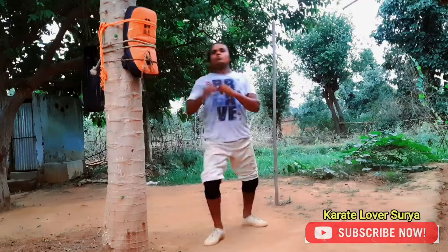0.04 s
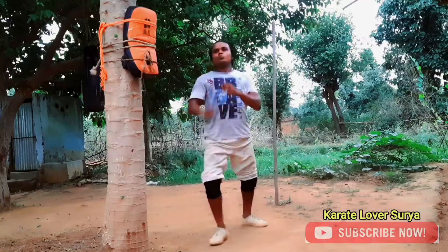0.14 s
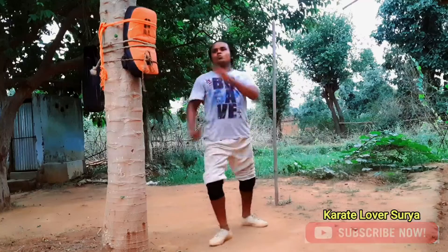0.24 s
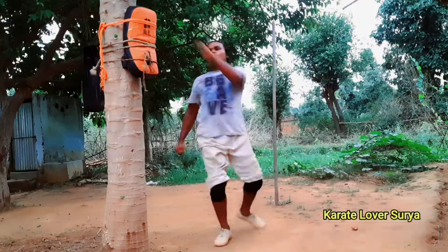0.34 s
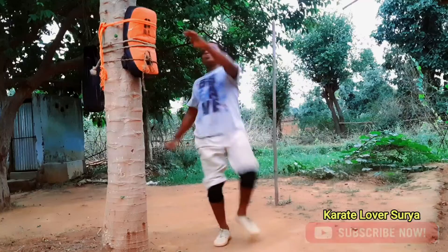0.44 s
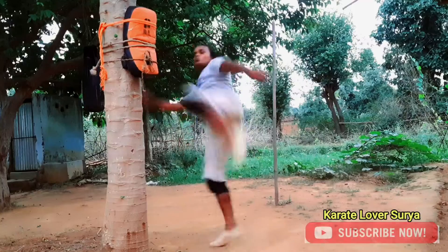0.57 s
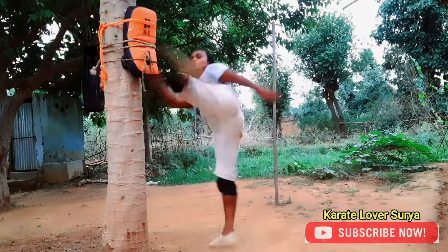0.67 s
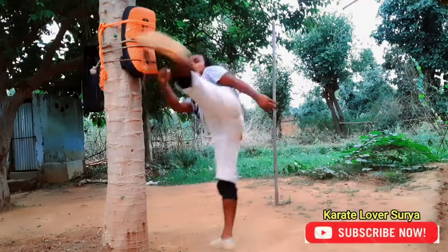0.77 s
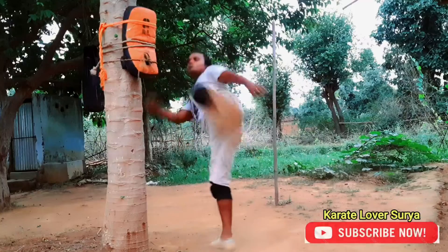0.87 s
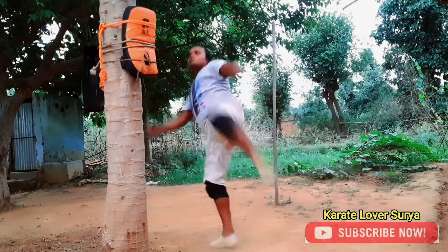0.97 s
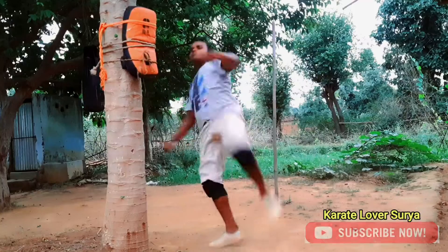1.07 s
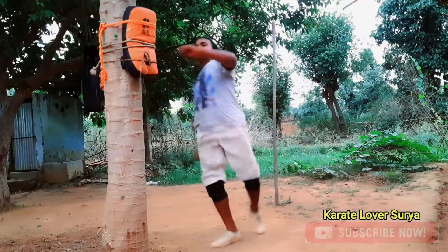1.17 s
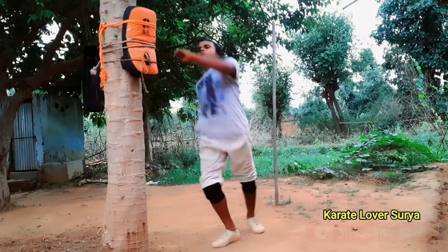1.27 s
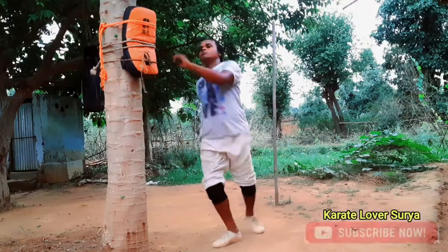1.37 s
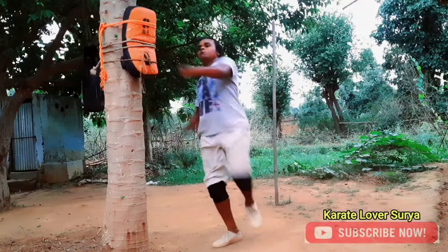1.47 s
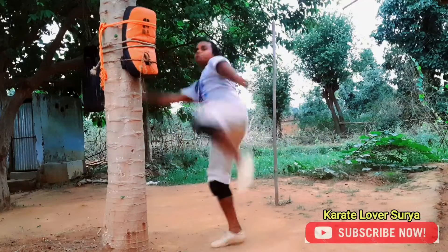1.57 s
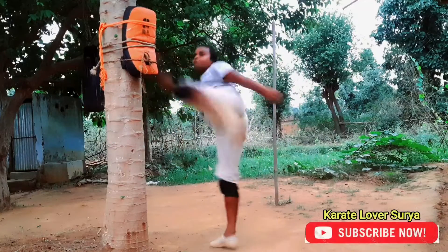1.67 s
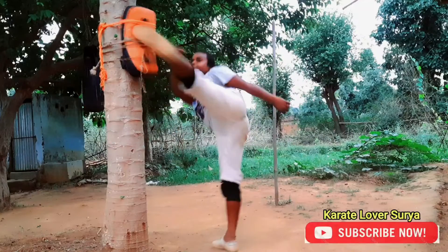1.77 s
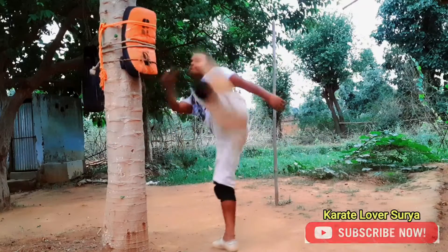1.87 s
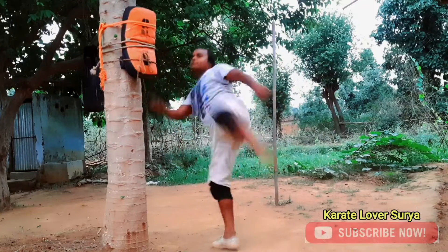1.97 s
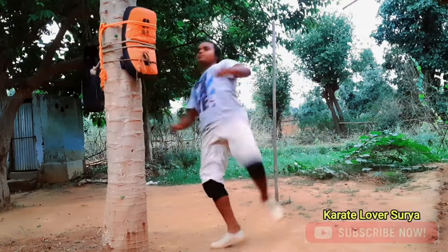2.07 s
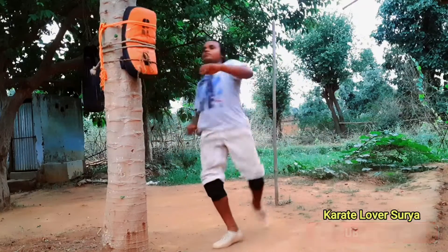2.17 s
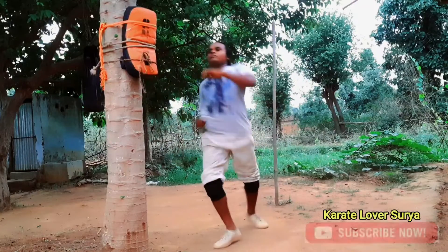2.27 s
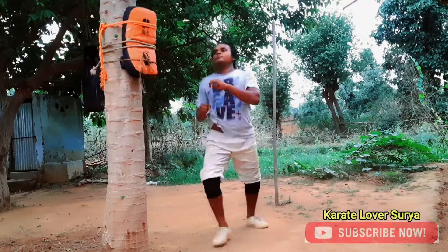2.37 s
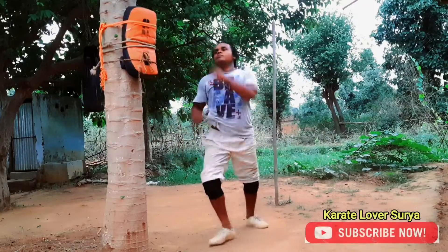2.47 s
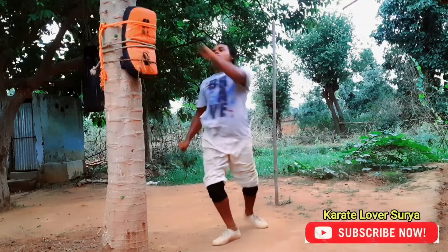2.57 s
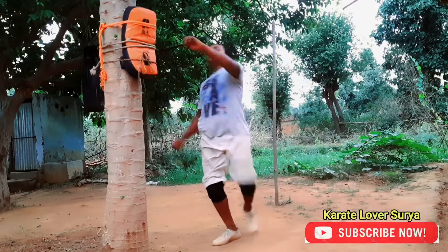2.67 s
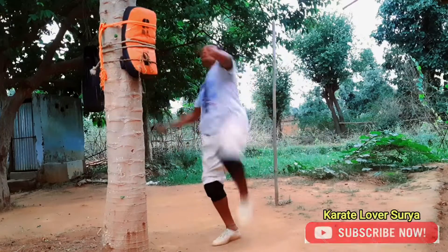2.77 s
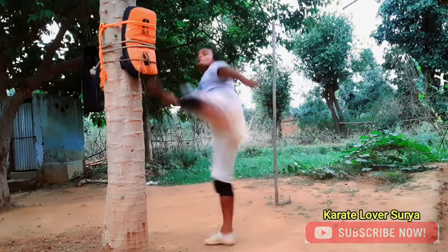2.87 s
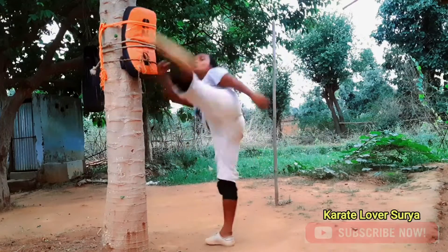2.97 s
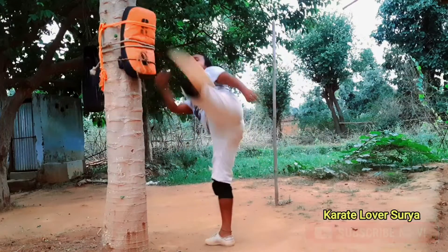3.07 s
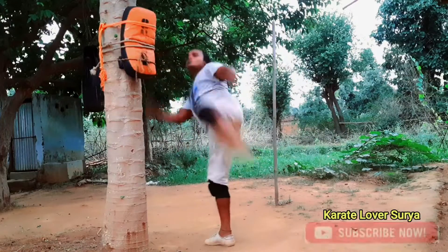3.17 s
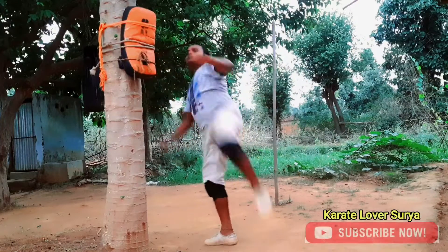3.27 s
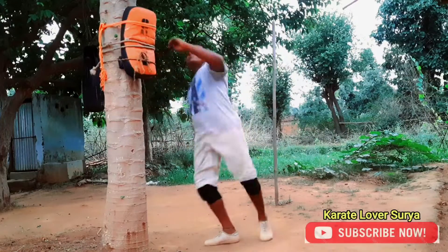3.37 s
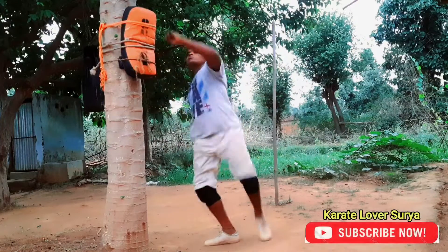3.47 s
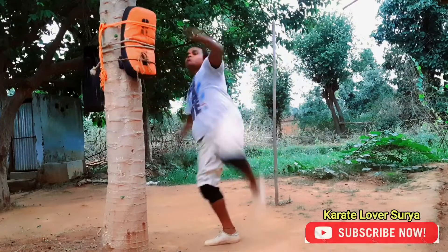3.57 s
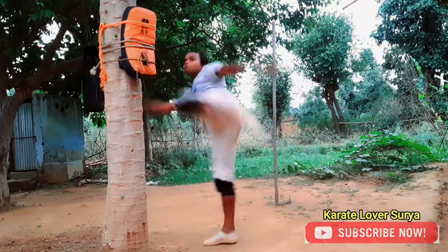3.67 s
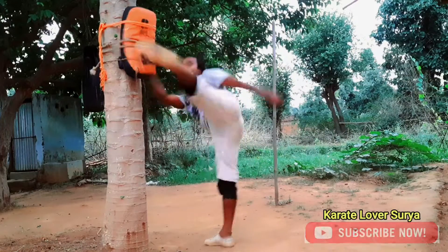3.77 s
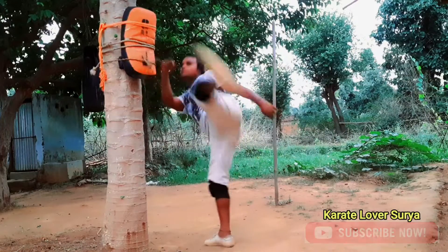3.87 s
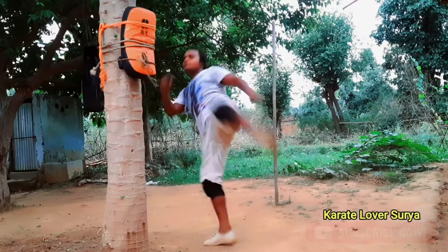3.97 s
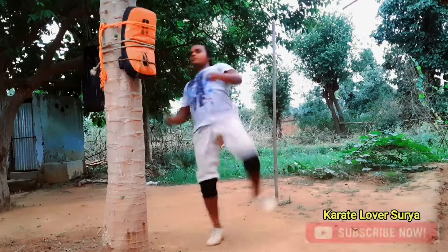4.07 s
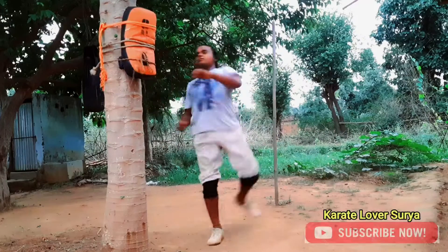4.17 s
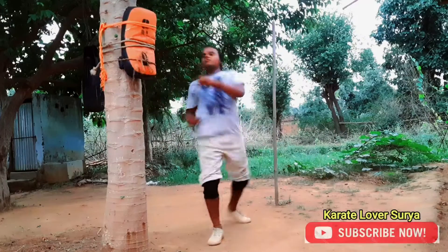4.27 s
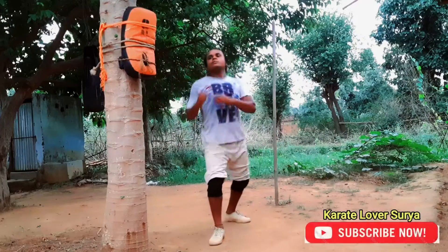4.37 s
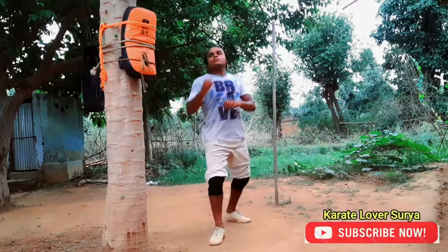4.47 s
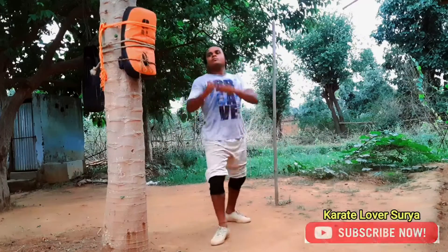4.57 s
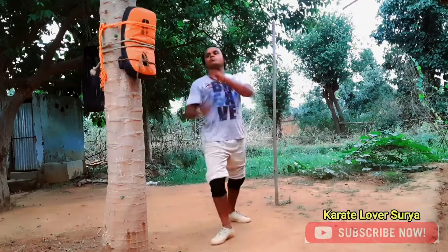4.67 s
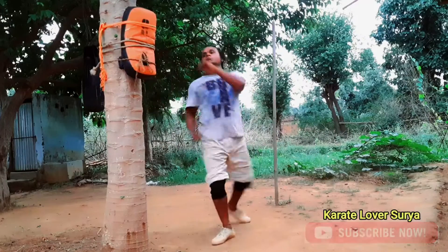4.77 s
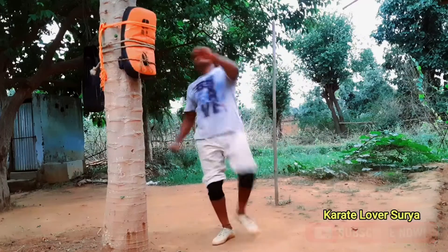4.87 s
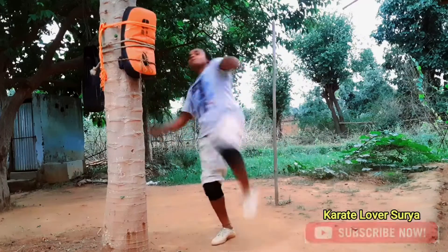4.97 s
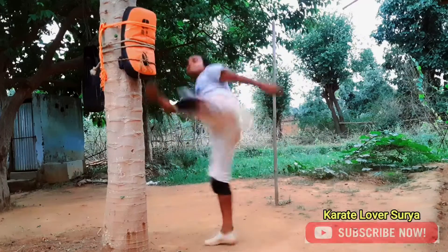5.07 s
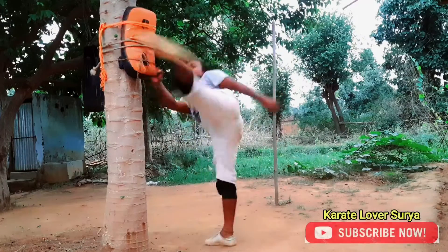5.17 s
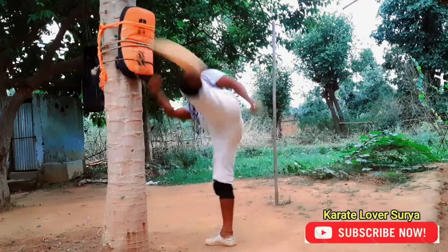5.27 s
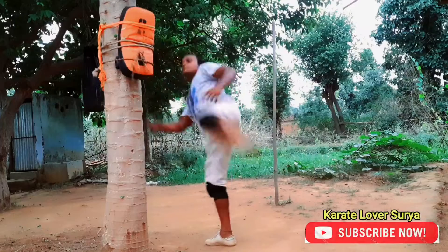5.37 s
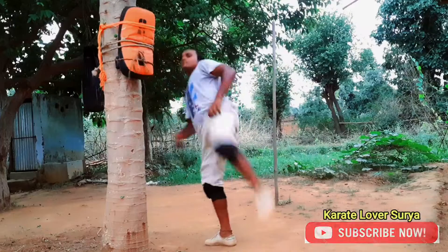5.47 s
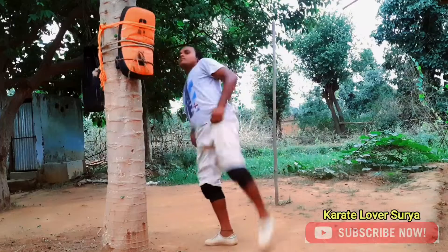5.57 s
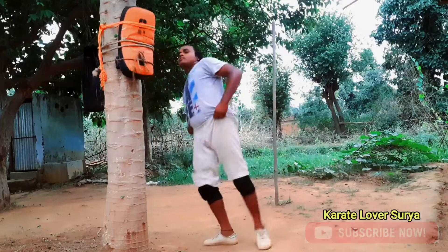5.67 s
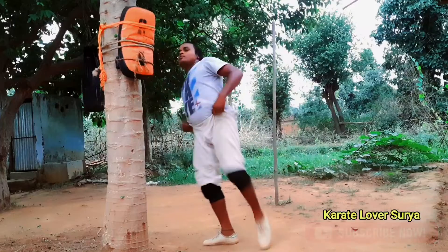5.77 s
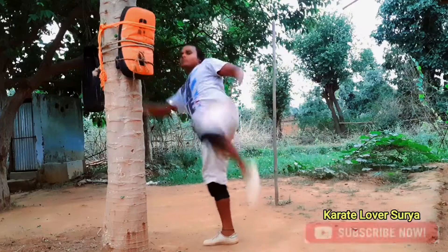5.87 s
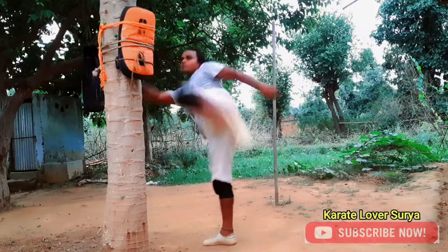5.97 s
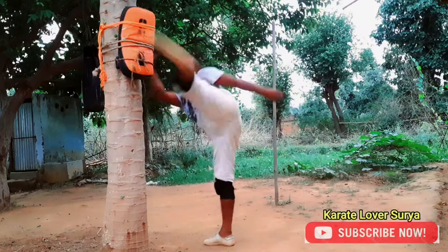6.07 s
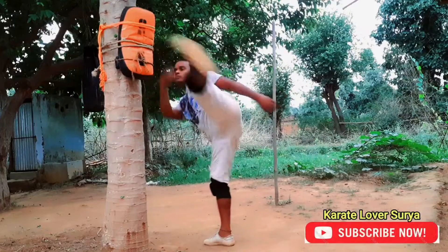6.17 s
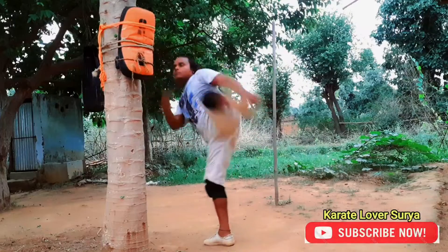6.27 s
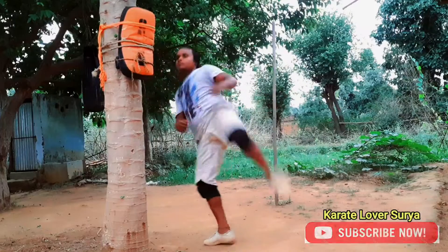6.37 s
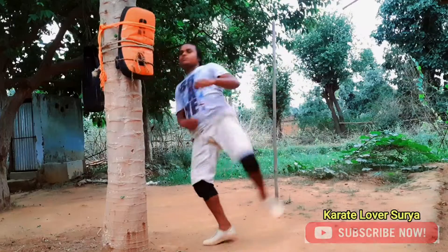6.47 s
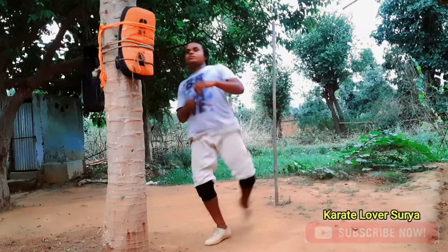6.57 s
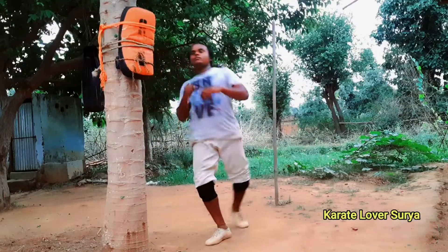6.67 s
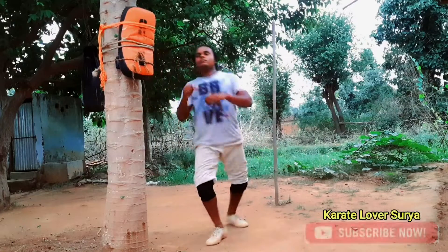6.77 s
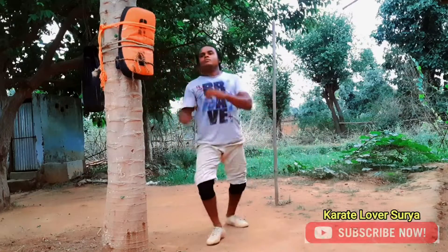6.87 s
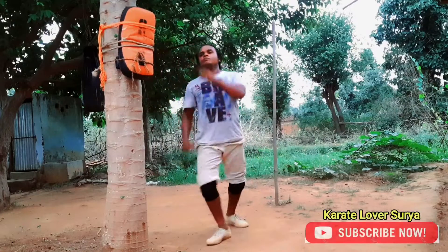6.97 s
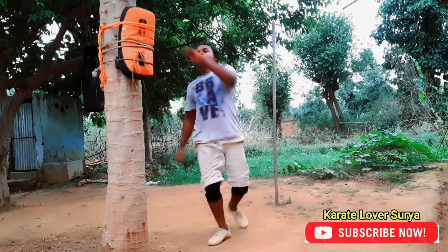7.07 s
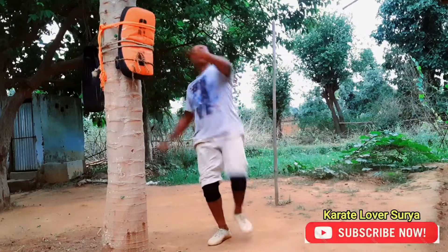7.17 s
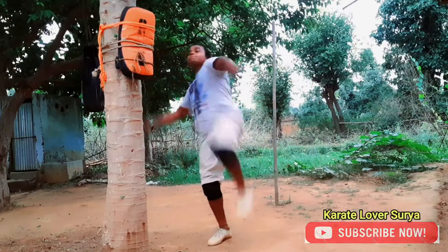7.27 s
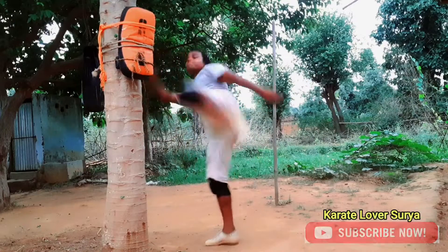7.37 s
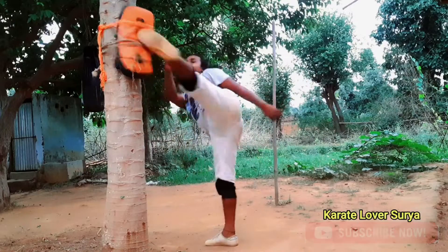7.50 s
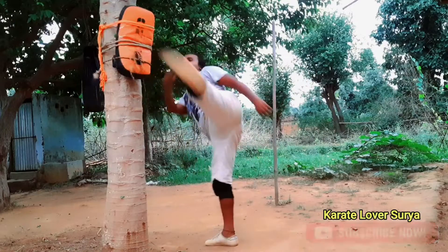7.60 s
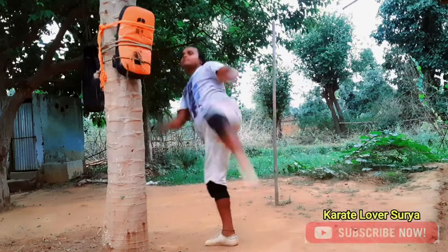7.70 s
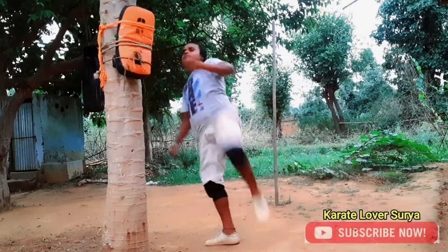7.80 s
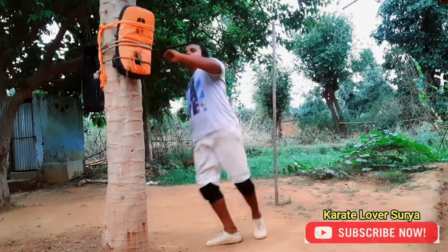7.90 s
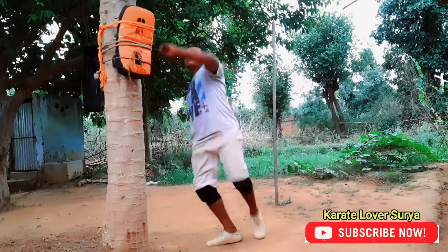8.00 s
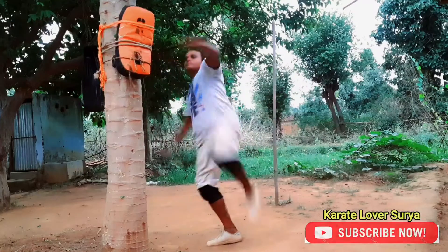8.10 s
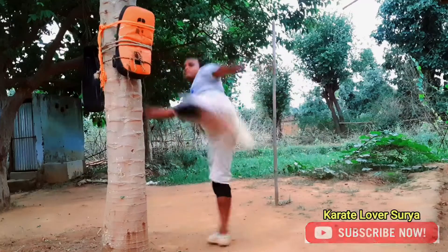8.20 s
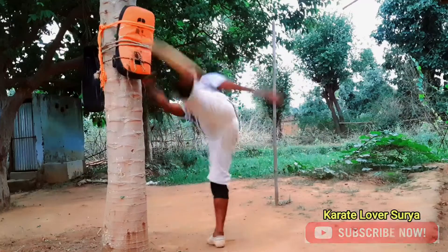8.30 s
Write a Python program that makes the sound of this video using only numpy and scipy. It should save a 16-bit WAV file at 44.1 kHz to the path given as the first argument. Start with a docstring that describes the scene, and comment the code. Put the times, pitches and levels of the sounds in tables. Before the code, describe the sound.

Seven hard kicks slap a foam pad tied to a tree, shoes scuffing sand between them, over faint cicadas and distant birds.

```python
"""Cicadas (swaying noise band), a cricket (gated narrow noise) and far leaves with hiss and rumble (noise) sound throughout.
Shoes slide on sand (granular noise) from the start, and far roosters crow early (two gliding partials), later sparsely.
From 0.8 s seven roundhouse kicks hit a foam pad tied to a tree trunk in a yard: noise slap, damped modes, scattered tail.
Between kicks shoes land (taps, crunch and thud). A small bird tweets from 1.4 s and a cuckoo hoots from 2.1 s (swept sines).
Two microphone ports hear it all."""
import sys
import numpy as np
from scipy import signal
from scipy.fft import rfft, irfft, next_fast_len
from scipy.io import wavfile
from scipy.ndimage import uniform_filter1d, map_coordinates

SR = 44100
rng = np.random.default_rng(int(sys.argv[2]) if len(sys.argv) > 2 else 0)


def master_out(mix):
    """Clip the mix to full scale and print it as 16-bit PCM to the path in sys.argv[1]."""
    frames = np.transpose(np.atleast_2d(mix))
    ceiling = np.clip(frames, -1, 1)
    pcm = np.round(ceiling * 32767).astype(np.int16)
    wavfile.write(sys.argv[1], SR, pcm)


N = 367794

# The kicks: start_s, level_db (before the slight left-right balance), then, relative to it, thump_db,
# knock_db for pad modes in four bands (below 400, 500, 850 Hz and above), treble_db (snap against slap),
# scatter_db; last contact_s
KICK_EVENTS = [(.769, -2.5, -6.5, -15, -19.5, -21, -19, -21, -16, 0.0054),
               (1.811, -5.5, -4.5, -27, -20, -10.5, -22, -14.5, -13, 0.0083),
               (3.042, -7, -7, -19, -13.5, -17, -17, -14, -14.5, .008),
               (3.818, -5, -9.5, -20, -3, -16, -13.5, -16, -15, 0.0098),
               (5.24, -7, -7, -11.5, -18.5, -18.5, -17.5, -14.5, -14.5, .008),
               (6.129, -1.5, -11, -20.5, -19.5, -26, -15, -10.5, -15.5, .007),
               (7.552, -8.5, -8, -25.5, -27, -21, -19, -16, -16, .006)]
# Relative spectra: frequency_hz, density_db (dB per Hz)
SAND_SCRAPE_SPECTRUM = [(120, -43.5), (200, -14.5), (329, -4.5), (433, -9), (624, -3), (1680, -8.5),
                        (2800, -15), (3640, -41.5), (6160, -120)]
SAND_GRIT_SPECTRUM = [(1470, -22), (2500, -6), (2940, -6), (5230, -6.5), (6600, -11.5), (7950, -10.5),
                      (14700, -22), (15600, -30), (16000, -47)]
LOW_RUMBLE_SPECTRUM = [(30, -25.5), (60, 2.5), (120, 2), (250, -4.5), (400, -28)]


def amp(db):
    """Logarithmic level: decibels to amplitude gain."""
    return 10 ** (np.asarray(db) / 20)


def unit(x):
    """Power normalization: scale to rms 1."""
    return x / np.sqrt(np.mean(x ** 2) + 1e-20)


def along(points, hz):
    """Logarithmic frequency scale: read (Hz, value) points at hz."""
    f, value = np.transpose(points)
    return np.interp(np.log(hz + 1), np.log(f + 1), value)


def curves(rows):
    """Linear interpolation in time: one value per sample for each column after the time."""
    s, *columns = np.transpose(rows)
    return [np.interp(np.arange(N) / SR, s, column) for column in columns]


def wobble(rate):
    """Slow random modulation: a smooth curve through rate random knots a second."""
    knots = rng.standard_normal(int(N * rate / SR) + 4)
    return map_coordinates(knots, [np.arange(N) * rate / SR])


def noise(gain, alike, n=N, mono_hz=0):
    """Partial coherence: rms-1 noise shaped by gain; left-right correlation alike, nearing 1 below mono_hz."""
    m = next_fast_len(n)
    hz = np.fft.rfftfreq(m, 1 / SR) + 1
    angle = np.arccos(np.clip(alike, -1, 1)) / 2 * hz / (hz + mono_hz)
    spectrum = rfft(rng.standard_normal((2, m))) * gain(hz)
    mid, side = irfft(spectrum * [np.cos(angle), np.sin(angle)], m)[:, :n]
    return unit(np.array([mid + side, mid - side]))


def colour(points):
    """Spectral shaping: the gain function of a spectrum table."""
    return lambda hz: amp(along(points, hz))


def band(hz, width_hz):
    """Resonance: gain over frequency that is halved half a width from the centre."""
    return lambda f: 1 / (1 + ((f - hz) / width_hz * 2) ** 2)


def add(out, s, x):
    """Linear superposition: mix x into out from time s."""
    part = out[:, round(s * SR):][:, :x.shape[-1]]
    part += x[..., :part.shape[1]]


def far(x, rate):
    """Multipath fading: a distant tone arrives by many paths, so its level flutters apart at each port."""
    return x * amp(2.7 * np.array([wobble(rate), wobble(rate)]))


def strokes(rows, spread):
    """Power summation: gain of overlapping strokes (s, hold s, dB, rise s, fall s); spread scales rise and fall."""
    t = np.arange(N) / SR
    power = 0
    for s, hold, db, rise, fall in rows:
        distance = np.maximum(np.maximum((s - t) / rise, (t - s - hold) / fall), 0)
        power = power + amp(db - 20 * distance / spread) ** 2
    return np.sqrt(power)


def air():
    """Broadband random noise: far leaves and microphone hiss, over a low rumble that comes and goes."""
    # Leaves and hiss, relative spectrum: frequency_hz, density_db (dB per Hz)
    leaf_spectrum = [(15, -26), (25, 0), (476, -10.5), (659, -13), (818, -12), (1070, -20), (3430, -18.5),
                     (4490, -11.5), (5430, -5.5), (7920, -8), (9320, -23.5), (14800, -18), (16000, -40)]
    rumble_db = -70.0 + 1.4 * wobble(0.67) + 2.5 * wobble(4.1)
    rumble = amp(rumble_db) * noise(colour(LOW_RUMBLE_SPECTRUM), 0.12)
    return rumble + amp(-61 + 0.78 * wobble(3)) * noise(colour(leaf_spectrum), .05)


def cicadas():
    """Quadrature modulation: slow noise on a swaying carrier is a buzzing band; a fainter fixed band joins it."""
    # Chorus level: time_s, level_db
    chorus_level = [(0.0, -56), (0.25, -54), (0.63, -57), (1.16, -59), (2.06, -59), (2.42, -59), (3.0, -55),
                    (3.21, -61), (4.44, -61.5), (4.78, -60.5), (5.22, -59), (5.67, -59), (5.78, -60.5),
                    (6.57, -58), (6.71, -60), (6.9, -64), (7.55, -57), (8.34, -59)]
    centre_hz, width_hz = 5330, 640
    sway_hz, sway_period_s, sway_top_s = 149.7, .575, 4.6  # the centre is highest at the top time
    side_hz, side_width_hz, side_db = 6230, 200, -11  # level relative to the main chorus
    level_db, = curves(chorus_level)
    hz = centre_hz + sway_hz * np.cos(2 * np.pi * (np.arange(N) / SR - sway_top_s) / sway_period_s)
    phase = 2 * np.pi * np.cumsum(hz) / SR

    def slow(f):
        """Low-pass filtering: it sets the width of the modulated band."""
        return 1 / (1 + (2 * f / width_hz) ** 4)

    chorus = noise(slow, -.2) * np.cos(phase) + noise(slow, -0.18) * np.sin(phase)
    buzz = unit(amp(1.1 * wobble(200) + 0.66 * wobble(19)))
    side_chorus = amp(side_db) * noise(band(side_hz, side_width_hz), 0)
    return amp(level_db) * (buzz * chorus + side_chorus)


def cricket():
    """Amplitude gating: about ten chirps a second of narrow noise, each filling three fifths of its period."""
    # Chirp timing: time_s, chirps_so_far (count)
    chirp_count = [(.1, 0), (1.385, 13), (2.465, 24), (2.97, 29), (4.425, 43), (5.04, 49), (6.99, 68),
                   (7.79, 76), (8.4, 82)]
    phase = curves(chirp_count)[0] % 1
    gate = np.sin(np.pi * np.clip(phase / .6, 0, 1)) ** .5
    return amp(-65.5 + 1.5 * wobble(2)) * gate * noise(band(7700, 80), 0)


def roosters():
    """Harmonic series: only two gliding partials survive the distance, hoarse and broken by echoes."""
    # Notes: start_s, length_s, start_pitch_hz, end_pitch_hz, first_partial_db, second_partial_db
    crow_notes = [(0.038, 0.19, 945, 948, -80, -57), (.2, 0.2, 970, 1045, -68, -60),
                  (.3, .1, 1238, 1235, -56, -56), (0.392, 0.26, 1035, 1040, -50, -55.5),
                  (.57, 0.19, 1205, 1195, -51, -48), (0.689, .11, 1053, 1050, -47.5, -53),
                  (0.801, 0.19, 1020, 1010, -62, -49), (1.015, .28, 1000, 975, -70, -67),
                  (1.296, 0.366, 972, 928, -75, -55.5), (3.45, .22, 985, 948, -89.5, -74),
                  (5.72, .26, 1290, 1230, -90, -70.5), (6.76, 0.43, 1165, 1110, -68.5, -95)]
    attack_s, release_s = .045, .07
    out = np.zeros((2, N))
    for s, length, start_hz, end_hz, first_db, second_db in crow_notes:
        t = np.arange(round(length * SR)) / SR
        hoarse = (1 + .004 * wobble(15) + .007 * wobble(70) + .012 * wobble(250))[:len(t)]
        hz = np.interp(t, [0, length], [start_hz, end_hz]) * hoarse
        phase = 2 * np.pi * np.cumsum(hz) / SR
        envelope = np.clip(np.minimum(t / attack_s, (length - t) / release_s), 0, 1)
        second = amp(second_db + (4 * wobble(35) + 2.2 * wobble(12))[:len(t)]) * np.sin(2 * phase)
        first = amp(first_db + 1.8 * wobble(20)[:len(t)]) * np.sin(phase)
        add(out, s, envelope * (second + first))
    return far(out, 30)


def cuckoo():
    """Frequency modulation: soft, nearly pure hoots that dip and then lift in pitch."""
    # Hoots: start_s, pitch_hz (scaled by the dip and lift), level_db
    hoot_notes = [(2.14, 457, -52.5), (2.53, 442, -56), (2.929, 426, -52.5), (3.32, 419, -58.5),
                  (3.66, 395, -62), (4.089, 387, -62.5), (5.415, 444, -51.5), (5.83, 433, -51.5),
                  (6.22, 427, -53.5), (6.59, 409, -54.5)]
    out, u = np.zeros((2, N)), np.linspace(0, 1, round(.125 * SR))  # u runs over each 0.125 s hoot
    glide = np.interp(u, [0, .3, .7, 1], [1.08, .95, 1.01, 1.01])
    for s, hz, db in hoot_notes:
        pitch = hz * glide * (1 + .015 * wobble(60)[:len(u)])
        add(out, s, amp(db) * np.sin(np.pi * u) * np.sin(2 * np.pi * np.cumsum(pitch) / SR))
    return far(out, 16)


def small_bird():
    """Frequency sweep: a level note, then a quick upward glide of a pure tone."""
    # Tweets: start_s, level_db
    tweet_times = [(1.45, -70), (4.49, -71.5), (6.96, -64), (7.27, -66.5)]
    out, t = np.zeros((2, N)), np.arange(round(.075 * SR)) / SR
    pitch = np.interp(t, [0, .026, .028, .045, .075], [4120, 4120, 3650, 4250, 4430])
    envelope = np.interp(t, [0, .006, .02, .027, .033, .06, .075], [0, 1, 1, 0, 1, .8, 0])
    for s, db in tweet_times:
        add(out, s, amp(db) * envelope * np.sin(2 * np.pi * np.cumsum(pitch) / SR))
    return out


def slides():
    """Granular friction: sand shears under the sole as dense grains, so the level is lumpy at millisecond scale."""
    # Strokes: full_pressure_s, hold_s, scrape_db, grit_db (above scrape), rise_s, fall_s;
    # rise and fall span 20 dB before the spreads below scale them
    slide_strokes = [(.02, 0.063, -54.5, -0.5, 0.14, 0.18), (.15, .02, -61, -15, .04, .05),
                     (.225, .06, -68, 11, 0.025, .08), (.37, .015, -41, -11, 0.062, 0.043),
                     (.43, .015, -39, 1, 0.03, 0.059), (.6, .09, -43.5, -0.5, 0.093, 0.082),
                     (1.09, 0.17, -50.5, 0.5, 0.11, 0.13), (1.33, .05, -65.5, 3.5, .05, .1),
                     (1.665, .04, -45.5, -4, .06, 0.097), (1.44, 0.045, -64.5, 4, .03, .08),
                     (1.79, 0.014, -50.5, -2, .04, 0.044), (1.93, 0.072, -62.5, 10.5, .05, 0.12),
                     (2.17, .05, -48.5, -1, 0.15, 0.07), (2.3, 0.093, -56, -1.5, 0.041, 0.14),
                     (2.59, .02, -54.5, 1.5, 0.038, 0.092), (2.71, 0.024, -66.5, 5.5, .03, 0.11),
                     (2.885, .045, -38, -7.5, 0.053, 0.074), (3.37, 0.083, -47, -5, 0.11, 0.095),
                     (3.54, 0.0118, -53, -7, 0.042, 0.037), (3.79, 0.025, -52, -0.5, .14, .03),
                     (4.09, .07, -46, -4, .1, 0.093), (4.33, 0.061, -61.5, 0, 0.07, .07),
                     (4.54, 0.018, -77, 2, .06, .06), (4.85, .02, -65.5, 1, .06, 0.11),
                     (5.07, .05, -43.5, -4.5, 0.038, 0.086), (5.2, 0.018, -57, 5, .04, 0.046),
                     (5.56, .06, -57.5, 5.5, 0.1, .06), (5.68, .08, -48.5, -1, 0.077, 0.14),
                     (6.08, 0.018, -51, -1.5, 0.11, .04), (6.37, 0.045, -73, 2, 0.053, 0.11),
                     (6.57, 0.046, -47.5, -1.5, .12, 0.092), (6.78, .07, -57, -0.5, .08, 0.11),
                     (7.05, 0.101, -63.5, 2.5, .07, .08), (7.38, 0.071, -43, -3, 0.056, 0.074),
                     (7.82, .02, -60.5, 4.5, .06, 0.049), (7.91, .05, -48.5, -3.5, 0.091, .06),
                     (8.03, 0.0257, -49, -0.5, 0.088, 0.065), (8.245, 0.029, -42.5, -7, 0.056, 0.077)]
    # The standing shoe turns back after every kick: delay_s, hold_s, scrape_db, grit_db (above scrape), rise_s
    turn_back = (0.23, 0.04, -57.5, 1.5, 0.34)
    turn_back_fall_s = .22
    scrape_spread, grit_spread = 0.89, 1.3  # factors on the rise and fall times
    rows = slide_strokes + [(kick[0] + turn_back[0], *turn_back[1:], turn_back_fall_s) for kick in KICK_EVENTS]
    scrape_rows = [(s, hold, db, rise, fall) for s, hold, db, _, rise, fall in rows]
    grit_rows = [(s, hold, db + grit_db, rise, fall) for s, hold, db, grit_db, rise, fall in rows]
    press = strokes(scrape_rows, scrape_spread)
    spray = strokes(grit_rows, grit_spread)
    grains = unit(amp(0.88 * wobble(250) + 1.5 * wobble(35)))
    # the hollow under the sole keeps changing shape: random patches over time and frequency
    _, _, spectrogram = signal.stft(noise(colour(SAND_SCRAPE_SPECTRUM), .55), SR, nperseg=1024)
    patches = rng.standard_normal(spectrogram.shape[1:])
    patches = uniform_filter1d(uniform_filter1d(patches, size=5, axis=0), size=5, axis=1)
    scrape = signal.istft(spectrogram * amp(3.4 * unit(patches)), SR, nperseg=1024)[1][:, :N]
    grit = spray * grains * noise(colour(SAND_GRIT_SPECTRUM), 0.038)
    rumble = amp(-20.0) * noise(colour(LOW_RUMBLE_SPECTRUM), 0.54)
    return grit + press * (grains * unit(scrape) + rumble)


def steps():
    """Impact excitation: heel then toe meet the sand as a sharp tap, a lower one, a short crunch and a dull thud."""
    # Shoes landing, and the pad falling back on the bark: start_s, level_db, tap_hz,
    # thud_db and treble_db (both against the crunch's scrape), decay_s (to -60 dB)
    landings = [(1.247, -37, 987, -25, -15, 0.2), (2.261, -32.5, 689, -10, -5.5, 0.126),
                (2.3, -43, 638, -11, 0.5, 0.13), (2.376, -42, 576, -3.5, -6, 0.079),
                (2.703, -46, 704, -17, -5, 0.07), (3.381, -36.5, 696, -6, -17, 0.079),
                (3.424, -26, 668, -13.5, -12, 0.13), (3.87, -22, 1505, -1.5, -10, 0.07),
                (4.29, -38, 682, -9.5, -16.5, 0.06), (5.648, -32, 646, -7, -2, 0.16),
                (6.688, -40.5, 550, -12.5, -22, 0.15), (6.735, -44.5, 641, -19.5, -1, 0.16),
                (6.834, -53, 810, -21.5, 10, 0.07), (7.964, -26, 680, -6, -16, 0.11)]
    out, t = np.zeros((2, N)), np.arange(SR // 4) / SR
    for s, db, hz, thud_db, treble_db, t60 in landings:
        crunch = noise(colour(SAND_SCRAPE_SPECTRUM), 0.35, len(t))
        crunch = crunch + amp(treble_db) * noise(colour(SAND_GRIT_SPECTRUM), 0.24, len(t))
        thud = amp(thud_db) * noise(colour(LOW_RUMBLE_SPECTRUM), .9, len(t)) * (1 - np.exp(-t / 0.0031))
        late = np.maximum(t - rng.uniform(0.0046, 0.016), 0)
        heel = np.sin(2 * np.pi * hz * t) * amp(-60 * t / .016)
        toe = amp(-3.5) * np.sin(2 * np.pi * .45 * hz * late) * amp(-60 * late / 0.023)
        envelope = amp(-7 - 60 * t / max(t60, .01)) * (1 - np.exp(-t / 0.0011))
        add(out, s, amp(db) * (heel + toe + envelope * (crunch + thud)))
    return out


def kick_slap(t, contact, treble_db):
    """Broadband impact: toes, instep and folds of the cover hit one after another as a ragged noise burst."""
    # Relative spectra of slap and brighter snap: frequency_hz, density_db (dB per Hz)
    slap_spectrum = [(180, -25.5), (300, -3), (1060, -4.5), (1600, -8.5), (1920, -6), (2610, -11),
                     (3240, -21), (4500, -18), (5850, -54), (9900, -120)]
    snap_spectrum = [(2350, -24), (4000, -1.5), (6150, -5), (8190, -3.5), (9790, -9), (14600, -4),
                     (16600, -28.5)]
    cracks = unit(amp(3.5 * wobble(900)[:len(t)]))
    burst = (cracks + 1.2 * np.exp(-t / 0.00055)) * (1 - np.exp(-t / 0.00022))
    burst = burst * amp(-60 * np.maximum(t - contact, 0) / .025)
    snap = amp(treble_db) * noise(colour(snap_spectrum), -0.13, len(t))
    return burst * (noise(colour(slap_spectrum), 0.31, len(t)) + snap)


def trunk_thump(t):
    """Damped free vibration: pad and trunk, pushed as a whole, swing in low decaying modes."""
    # Modes: frequency_hz (varied about 4 % a kick), level_db, decay_s (to -60 dB), first_swing (sign out or in, and size)
    trunk_modes = [(62.4, 2.5, 0.17, -1), (95, -2.5, 0.027, 0.99), (126.5, -2, .16, 0.96)]
    late = np.maximum(t - .003, 0)  # the foam takes a moment to pass the push on
    thump = 0
    for hz, db, t60, swing in trunk_modes:
        thump = thump + swing * amp(db - 60 * late / t60) * np.sin(2 * np.pi * hz * rng.normal(1, 0.04) * late)
    return thump


def pad_knock(t, contact, knock_db):
    """Modal synthesis: the pad rings in damped modes, driven harder while the foot presses."""
    # Modes: frequency_hz (varied about 1.6 % a kick), level_db (the kick's band level adds), decay_s (to -60 dB)
    pad_modes = [(242.1, -0.5, 0.2), (267, 1, 0.19), (330.4, -3, .15), (437.4, -3.5, 0.13),
                 (556.3, 2.5, 0.091), (704, -1, 0.088), (912, -10, 0.11), (1405, -5.5, 0.061),
                 (1990, -7.5, .05), (2380, -8, 0.079)]
    # Edges between the four knock bands: frequency_hz
    knock_edges = [400, 500, 850]
    knock = np.zeros((2, len(t)))
    for hz, db, t60 in pad_modes:
        start = rng.random() + rng.normal(0, hz / 6000, (2, 1))  # higher modes reach the ports less alike
        db = db + knock_db[np.searchsorted(knock_edges, hz)] + rng.normal(0, 2)
        knock += amp(db - 60 * t / t60) * np.sin(2 * np.pi * (hz * rng.normal(1, 0.016) * t + start))
    press = 1 + 1.2 * amp(-60 * np.maximum(t - contact, 0) / 0.045)
    return knock * (1 - np.exp(-t / .002)) * press


def yard_scatter(t):
    """Diffuse scattering: trees and shed return a lumpy noise tail whose decay time depends on frequency."""
    # Decay: frequency_hz, decay_s (to -60 dB)
    yard_decay = [(100, .3), (500, 0.23), (2000, 0.27), (6000, 0.33), (15000, 0.21)]
    # Tail, relative spectrum: frequency_hz, density_db (dB per Hz)
    scatter_spectrum = [(47, -29.5), (80, -1.5), (163, -14), (253, -9.5), (378, -12.5), (550, -9.5),
                        (802, -17), (2380, -21.5), (3540, -27.5), (12500, -38.5), (16000, -48)]
    source = noise(colour(scatter_spectrum), .2, len(t), mono_hz=400)
    hz, frame_s, spectrogram = signal.stft(source, SR, nperseg=256)
    decay = amp(-60 * frame_s / along(yard_decay, hz)[:, None])
    tail = signal.istft(spectrogram * decay, SR, nperseg=256)[1][:, :len(t)]
    lumps = amp(0.73 * wobble(60)[:len(t)] + 0.8 * wobble(400)[:len(t)])  # separate echoes
    return tail * (1 - np.exp(-t / 0.0048)) * lumps


def kicks():
    """Superposed impact responses: the instep lands over a few ms as slap, thump, knock and scatter."""
    out, t = np.zeros((2, N)), np.arange(SR // 2) / SR
    balance = amp([[.3], [-.3]])  # left 0.6 dB louder than right
    for s, db, thump_db, *knock_db, treble_db, scatter_db, contact in KICK_EVENTS:
        whole = amp(-8) * kick_slap(t, contact, treble_db) + amp(thump_db) * trunk_thump(t)
        whole = whole + pad_knock(t, contact, knock_db) + amp(scatter_db) * yard_scatter(t)
        add(out, s, amp(db) * whole * balance)
    return out


def scene():
    """Linear superposition: all sources at the two ports."""
    background = air() + cicadas() + cricket() + roosters() + cuckoo() + small_bird()
    return background + slides() + steps() + kicks()


def record(dry):
    """Band limiting and saturation: deep bass drops, peaks round off near full scale, the top is cut."""
    top_hz = 16700
    wet = signal.sosfilt(signal.butter(2, 35, "highpass", fs=SR, output="sos"), dry)
    wet = wet / (1 + np.abs(wet) ** 8) ** (1 / 8)
    m = next_fast_len(N + 4096)
    return irfft(rfft(wet, m) * (np.fft.rfftfreq(m, 1 / SR) < top_hz), m)[:, :N]


dry = scene()
out = record(dry)
master_out(out)
```